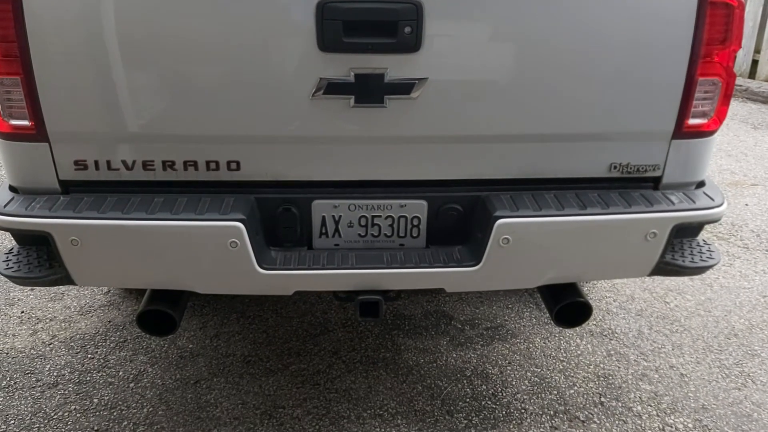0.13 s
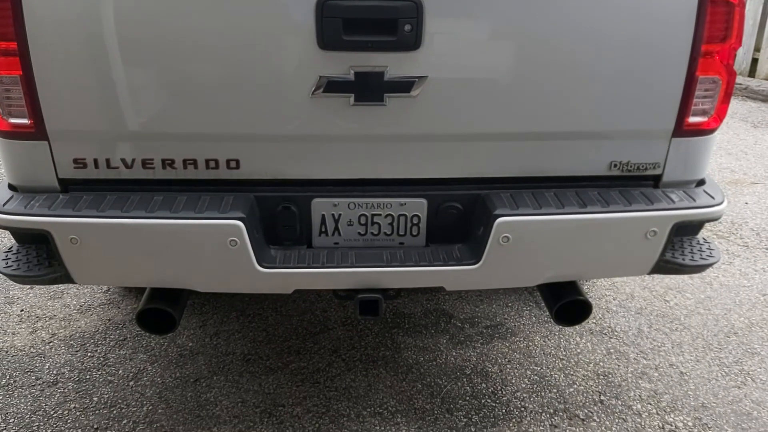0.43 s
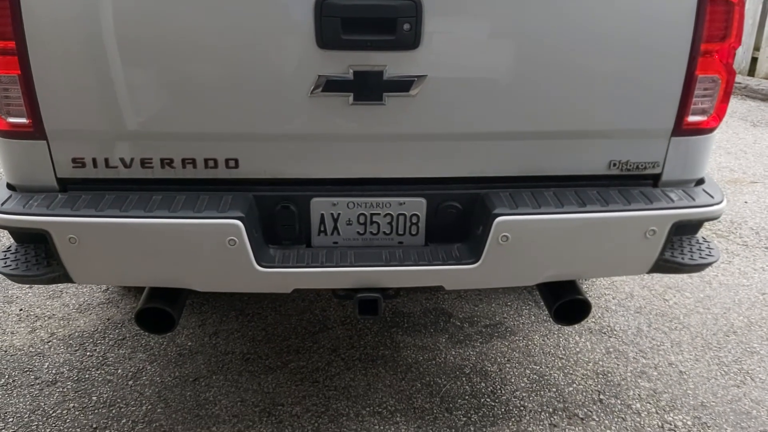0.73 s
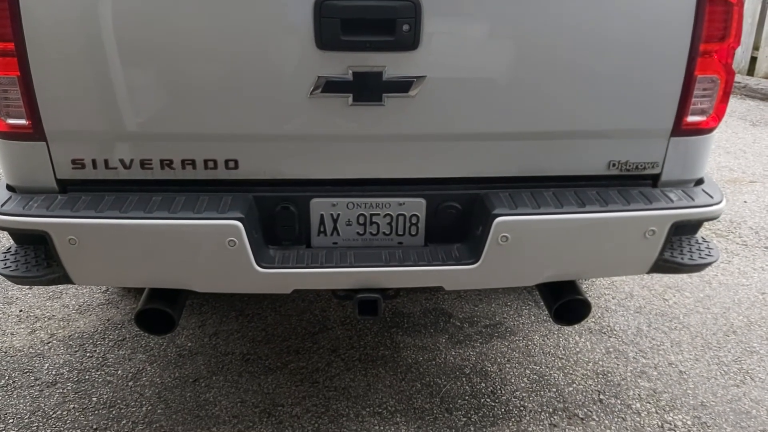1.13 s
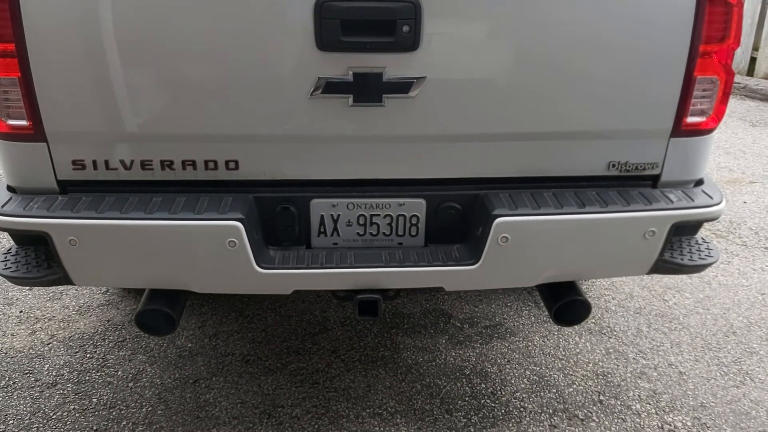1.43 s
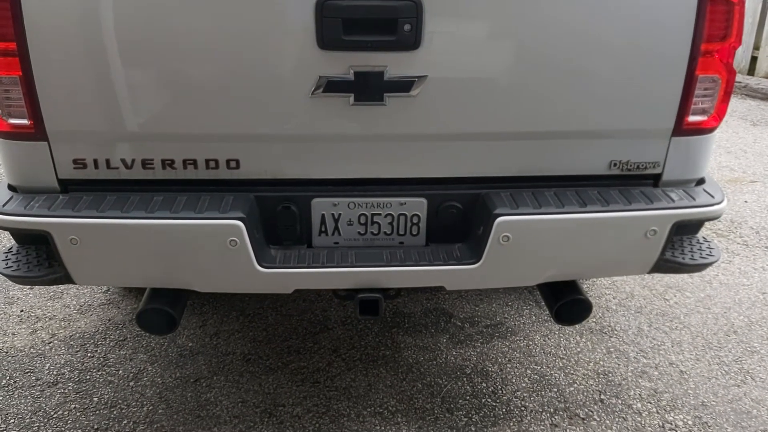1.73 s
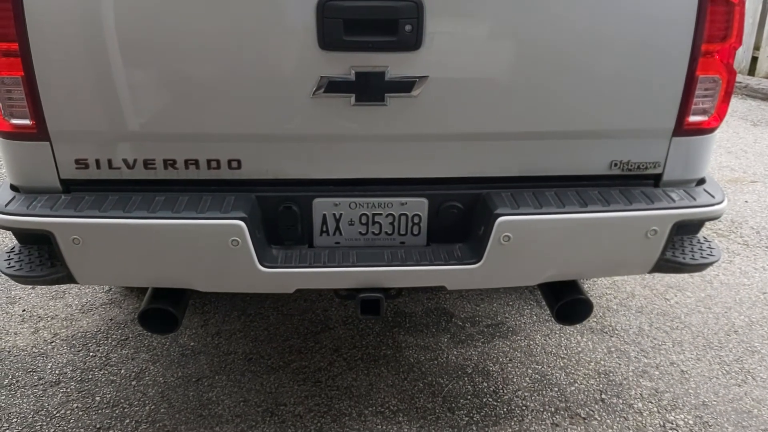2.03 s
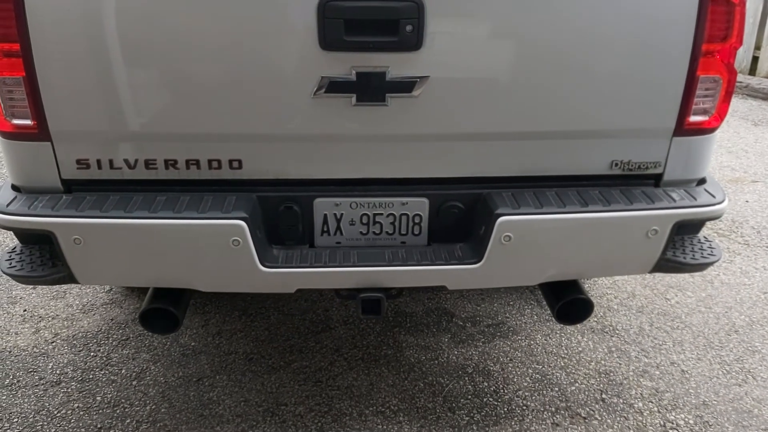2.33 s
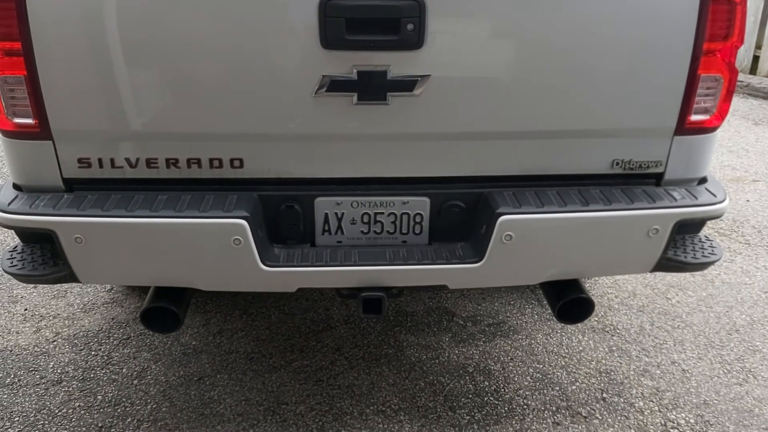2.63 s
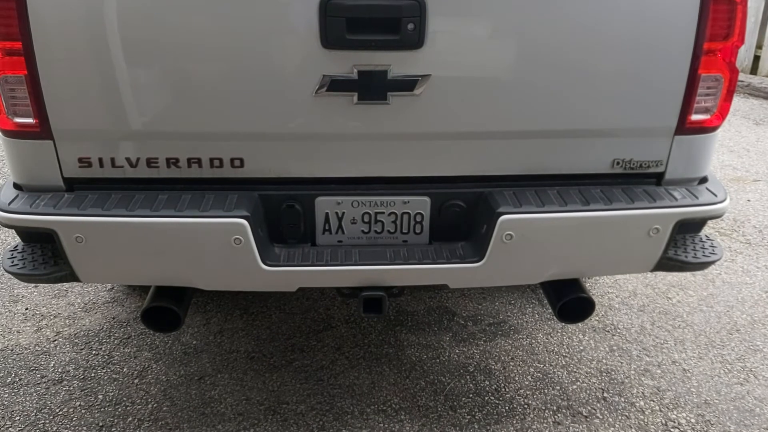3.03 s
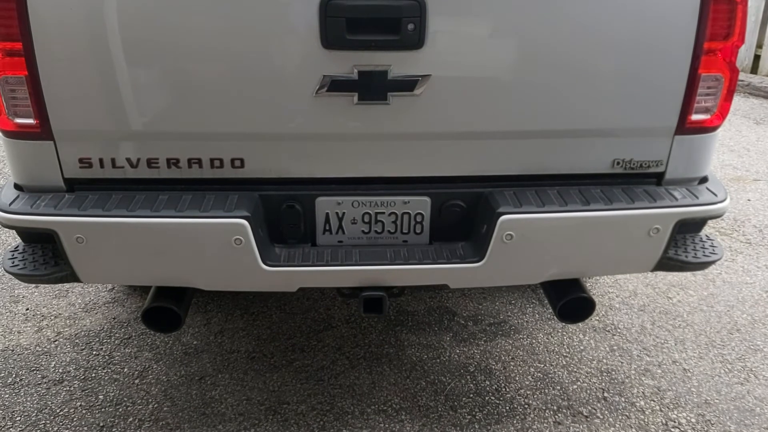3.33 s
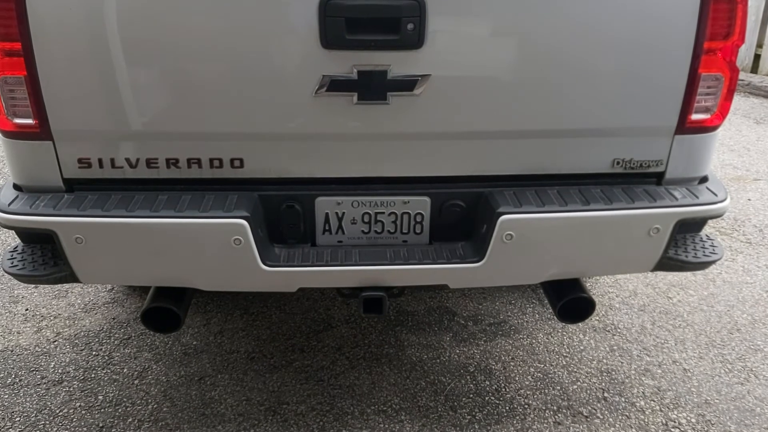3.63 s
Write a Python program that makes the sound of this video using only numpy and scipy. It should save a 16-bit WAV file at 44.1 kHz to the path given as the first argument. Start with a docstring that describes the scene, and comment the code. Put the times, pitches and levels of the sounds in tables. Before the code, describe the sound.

A pickup truck engine starts with a loud exhaust burst, then settles into a rumbling idle.

```python
"""On a paved drive, behind its twin tailpipes, a V8 pickup is heard starting cold.
The starter rasps as the first cylinders fire. The engine speeds up, drops back and settles
into an uneven, chugging idle. Each firing thuds through the muffler, rings the pipes and
pushes out a hiss of gas. The metal ticks now and then, and small birds chirp far off."""
import sys
import numpy as np
from scipy import signal
from scipy.fft import rfft, irfft
from scipy.io import wavfile
from scipy.ndimage import uniform_filter1d

SR = 44100
rng = np.random.default_rng(int(sys.argv[2]) if len(sys.argv) > 2 else 0)


def generate_wav(sig):
    """Save sig (samples, or channels by samples) to the path in sys.argv[1] as 16-bit PCM at SR."""
    pcm = np.round(np.clip(np.atleast_2d(sig).T, -1, 1) * 32767).astype(np.int16)
    wavfile.write(sys.argv[1], SR, pcm)


N = 166698
T = np.arange(N) / SR
CYLINDERS = 8  # each fires once per engine cycle

# Engine speed: t/s, firing rate/Hz
FIRING_RATE = [(0.0, 78.8), (0.1, 86.8), (0.2, 96.6), (0.3, 100.78), (0.42, 100.54), (0.55, 98.91),
               (0.7, 93.3), (0.85, 89.15), (1.0, 88.31), (1.3, 84.86), (1.55, 79.84), (1.8, 75.27),
               (2.07, 72.99), (2.35, 70.12), (2.8, 68.79), (3.15, 68.61), (3.5, 67.43), (3.78, 66.59)]
# The engine starts racing, then coasts, sags and idles. Each change: middle t/s, length/s
STATE_CHANGES = [(0.12, 0.064), (0.71, 0.11), (1.425, 0.11), (2.127, 0.61)]
# How hard the engine works: t/s, thud level/dB, pipe ring level/dB
ENGINE_LEVELS = [(0, -36, -58.5), (.14, -14.5, -40), (.3, -25, -32.5), (.8, -28, -35), (1.35, -25.5, -31.5),
                 (1.8, -34.5, -40), (2.6, -28, -36.5), (3.78, -28.5, -35.5)]


def amp(db):
    """Turn decibels into a factor to multiply by."""
    return 10 ** (np.asarray(db) / 20)


def unit(x):
    """Scale a signal to an average size (rms) of 1."""
    return x / np.sqrt(np.mean(x ** 2) + 1e-20)


def curve(rows, column=1):
    """Join a time table's points with lines, giving a value per sample."""
    rows = np.array(rows)
    return np.interp(T, rows[:, 0], rows[:, column])


def at_hz(points, hz):
    """Look up a frequency table, with octaves evenly spaced."""
    f, value = np.transpose(points)
    return np.interp(np.log(hz + 1), np.log(f + 1), value)


def add(mix, s, sound):
    """Mix a sound in, starting at s seconds."""
    part = mix[max(round(s * SR), 0):][:len(sound)]
    part += sound[:len(part)]


def drift(per_s):
    """A random wander, up to about per_s wiggles a second."""
    hz = np.fft.rfftfreq(N, 1 / SR)
    return unit(irfft(rfft(rng.standard_normal(N)) / (1 + (hz / per_s) ** 4), N))


def hiss(colour):
    """Noise with a given tone colour, partly alike on the left and right."""
    # How alike the sides are: f/Hz, likeness (1 = the same)
    likeness = [(200, 0.94), (1300, 0.98), (3000, 0.53)]
    hz = np.fft.rfftfreq(N, 1 / SR)
    left, other = rfft(rng.standard_normal((2, N)))
    same = np.clip(at_hz(likeness, hz), 0, 1)
    right = same * left + np.sqrt(1 - same ** 2) * other
    return unit(irfft(np.array([left, right]) * amp(at_hz(colour, hz)), N))


def muffle(x, size=8192):
    """The muffler lets the bass through and rings briefly after each push."""
    # What gets through: f/Hz, gain/dB
    response = [(20, -54), (38, -8), (75, -12), (175, -7.5), (270, -4.5), (370, -15.5), (520, -40.5),
                (3000, -92)]
    log_gain = np.log(amp(at_hz(response, abs(np.fft.fftfreq(size, 1 / SR)))))
    spectrum = np.exp(np.conj(signal.hilbert(log_gain)))  # no ringing before the push
    ring = irfft(spectrum[:size // 2 + 1])
    return signal.fftconvolve(x, ring[:size // 2])[:N]


def starter():
    """The starter and the first rush of gas rasp, then stop once the engine runs."""
    # Loudness: t/s, level/dB
    levels = [(.008, -30), (.02, -22.5), (.06, -27.5), (.155, -36), (.18, -44), (.4, -111)]
    # Tone colour: f/Hz, relative level/dB
    colour = [(500, -18), (690, 6.5), (950, -14), (1450, 0.5), (3400, -19.5), (6200, -13), (7400, -26.5),
              (15500, -28.5)]
    return hiss(colour) * amp(curve(levels))


def drone(firings, waver_depth=.07, waver_per_s=8, boom_hz=173, boom_width_hz=4.5, boom_gain=1.1):
    """Exhaust tones follow the engine's speed and swell as they pass the pipe's booming pitch."""
    # Tones in each engine state: multiple of the cycle rate, relative level/dB
    racing = [(8, -8.5), (11, -26), (13, -23), (16, -21.5), (19, -27), (24, -21.5)]
    coasting = [(8, -25.5), (9, -29), (11, -25), (13, -31.5), (16, -28), (22, -28)]
    sagging = [(5, -30), (8, -22), (10, -24), (13, -25.5), (16, -30), (19, -31), (26, -28.5)]
    idling = [(5, -26), (8, -16.5), (9, -23.5), (11, -22), (12, -27), (13, -28), (15, -32), (16, -17),
              (17, -33.5), (19, -28), (20, -25), (30, -24.5), (32, -29)]
    # Early boost to all tones: t/s, gain/dB
    boost = [(.2, 3.5), (.4, 0)]
    cycles, cycle_hz = firings / CYLINDERS, curve(FIRING_RATE) / CYLINDERS
    entered = [np.clip((T - s) / length + .5, 0, 1) for s, length in STATE_CHANGES] + [0]
    strengths = {}
    for i, tones in enumerate([racing, coasting, sagging, idling]):
        share = entered[i] - entered[i + 1]
        for k, db in tones:
            strengths[k] = strengths.get(k, 0) + amp(db) * share
    out = np.zeros(N)
    for k in sorted(strengths):
        waver = 1 + waver_depth * (drift(waver_per_s) + 1j * drift(waver_per_s))
        boom = 1 + boom_gain / (1 + ((k * cycle_hz - boom_hz) / boom_width_hz) ** 2)
        smear = k ** 2 / 24  # the long pipe smears each pulse into a falling chirp
        tone = np.exp(2j * np.pi * (k * cycles + smear))
        out += strengths[k] * boom * (waver * tone).real
    return out * amp(curve(boost))


def thuds(firings):
    """Cold fuel burns unevenly: each firing sends a soft, noisy puff through the muffler."""
    puffs = rng.standard_normal(N) * (1 + np.cos(2 * np.pi * firings))
    return unit(muffle(puffs)) * amp(curve(ENGINE_LEVELS))


def tailpipe(firings, rough=0.83, swell_s=0.00069):
    """Each firing rings the pipe with a random strength."""
    # The pipe's own notes: f/Hz, relative level/dB, time to fade by 60 dB/s
    notes = [(257.5, 5, .12), (387.7, 2, .2), (460.6, -2.5, 0.17), (611, -4.5, 0.11)]
    clicks = np.diff(np.floor(firings), prepend=0)
    clicks *= 1 - rough + rough * rng.standard_normal(N)
    t = np.arange(SR // 4) / SR
    ring = sum(amp(db - 60 * t / t60) * np.sin(2 * np.pi * hz * t) for hz, db, t60 in notes)
    ring *= 1 - np.exp(-t / swell_s)
    return unit(signal.fftconvolve(clicks, ring)[:N]) * amp(curve(ENGINE_LEVELS, column=2))


def gas(firings, steady=0.44, lag_firings=0.23, throb_db=2.0, rough_db=1.3, fizz_db=-37.5):
    """Gas rushes out in a puff per firing; its high fizz follows only in part."""
    # Loudness of the rasp: t/s, level/dB
    levels = [(.02, -36), (.14, -21), (.3, -30.5), (.9, -43.5), (1.6, -48.5), (2.5, -40), (3.5, -36.5)]
    # Tone colours: f/Hz, relative level/dB
    rasp_colour = [(400, -2.5), (750, 2.5), (980, -14.5), (1250, -1), (1520, -8), (1780, -16),
                   (2080, -10.5), (3000, -22), (4200, -50.5)]
    fizz_colour = [(2000, -32), (3200, -3), (4400, -5), (6450, -9), (7000, -18.5), (15500, -23.5)]
    puff_number = np.floor(firings - lag_firings).astype(int)
    puff_age = (firings - lag_firings) % 1
    surge = np.cos(2 * np.pi * 3 * (firings - .5) / CYLINDERS)  # three per engine cycle
    strength = amp(throb_db * surge + rough_db * rng.standard_normal(N)[puff_number])
    flow = unit(uniform_filter1d(steady + strength * np.exp(-puff_age), size=40))
    rasp = hiss(rasp_colour) * flow * amp(curve(levels))
    fizz = hiss(fizz_colour) * unit(flow + 2) * amp(fizz_db + 0.56 * curve(levels))
    return rasp + fizz


def ticks(fade_s=0.1, rise_s=0.0008, level_db=-3.5):
    """The metal pipe mouths give short rings."""
    # Each tick: t/s, relative level/dB, f/Hz
    rings = [(.014, -15, 687), (0.015, -13, 1364), (.158, -17, 1452), (3.554, -24.5, 1285)]
    out, t = np.zeros(N), np.arange(SR // 10) / SR
    for s, db, hz in rings:
        loudness = amp(db + level_db - 60 * t / fade_s) * (1 - np.exp(-t / rise_s))
        add(out, s, loudness * np.sin(2 * np.pi * hz * t))
    return out


def first_firings(thump_db=35, boom_hz=92, fade_s=0.18, boom_db=-8.5):
    """The first heavy firings thump through the muffler and set its bass ringing."""
    # Each firing: t/s, relative level/dB
    bangs = [(.021, 3.5), (0.045, 3.5), (0.059, 7), (0.074, 4.5), (0.097, 3.5), (0.105, 5), (.160, 5)]
    kicks, t = np.zeros(N), np.arange(SR // 4) / SR
    for s, db in bangs:
        add(kicks, s, amp([db]))
    boom = amp(boom_db - 60 * t / fade_s) * np.sin(2 * np.pi * boom_hz * t)
    return signal.fftconvolve(kicks, boom)[:N] - amp(thump_db) * muffle(kicks)


def birds(echo_s=0.3):
    """Birds sing thin, scratchy, rising notes that echo around the yard."""
    # Each note: t/s, length/s, start f/Hz, end f/Hz, level/dB
    notes = [(1.783, .11, 5000, 5700, -61), (1.877, .03, 3900, 5900, -59), (1.96, .02, 4300, 6100, -56.5),
             (3.255, .09, 4400, 6300, -56.5)]
    song = np.zeros(N)
    scratch_hz = 260 * drift(500)
    for s, length, start_hz, end_hz, db in notes:
        progress = np.arange(0, 1, 1 / (length * SR))
        hz = start_hz + (end_hz - start_hz) * progress + scratch_hz[round(s * SR):][:len(progress)]
        loudness = amp(db) * np.sin(np.pi * progress) ** .5
        add(song, s, loudness * np.sin(2 * np.pi * np.cumsum(hz) / SR))
    t = np.arange(SR // 2) / SR
    yard = rng.standard_normal((2, len(t))) * amp(-60 * t / echo_s)
    yard /= np.linalg.norm(yard[0])
    return song + signal.fftconvolve(song[None], yard, axes=1)[:, :N]


def idle_chug(firings, uneven_db=1.0):
    """As the engine idles under load, each pipe note swells once per cycle, at its own moment."""
    # Chug and clatter: f/Hz, level/dB, place in the cycle/firings, length/s
    notes = [(325.6, -26.5, 6.5, 0.04), (384.4, -31.5, 6.2, .12), (455.3, -31, 4.8, 0.1),
             (608, -37.5, 4.3, .085), (700.3, -37.5, 6.7, .07), (1288, -42, 2.2, .025),
             (2074, -46, 6.6, .03)]
    out = np.zeros(N)
    middle, fade = STATE_CHANGES[-1]
    for hz, db, place, length in notes:
        t = np.arange(0, length, 1 / SR)
        chug = np.sin(2 * np.pi * hz * t) * np.sin(np.pi * t / length) ** 2
        cycle_number = (firings - place) // CYLINDERS
        for s in T[np.flatnonzero(np.diff(cycle_number))]:
            load = np.clip((s - middle) / fade + .5, 0, 1)
            add(out, s - length / 2, load * amp(db + uneven_db * rng.standard_normal()) * chug)
    return out


def scene():
    """Add up the sounds; one running count of firings keeps the engine's rhythms in step."""
    firings = np.cumsum(curve(FIRING_RATE)) / SR
    exhaust = first_firings() + drone(firings) + thuds(firings) + tailpipe(firings) + gas(firings)
    return exhaust + starter() + ticks() + birds() + idle_chug(firings)


def record(dry, knee=.55, top_hz=15700):
    """Two microphone openings hear the scene; loud peaks are rounded and the top treble is cut."""
    # Left side compared with right: f/Hz, level/dB
    balance = [(250, -1), (1000, -4.5), (4000, -4.5), (9000, -1)]
    # How far the left side is ahead: f/Hz, phase/radians
    lead = [(100, 0.3), (500, 0.45), (1200, 1.41)]
    hz = np.fft.rfftfreq(2 * N, 1 / SR)
    left = amp(at_hz(balance, hz) / 2) * np.exp(.5j * at_hz(lead, hz))
    fade_out = np.minimum(T[::-1] * SR / 200, 1)
    stereo = irfft(rfft(dry * fade_out, 2 * N) * np.array([left, 1 / left]))[:, :N]
    clipped = np.clip(stereo, -knee, knee)
    rounded = clipped + (1 - knee) * np.tanh((stereo - clipped) / (1 - knee))
    treble_cut = signal.firwin(511, top_hz, window=("kaiser", 9), fs=SR)
    return signal.oaconvolve(rounded, treble_cut[None], "same")


dry = scene()
out = record(dry)
generate_wav(out)
```